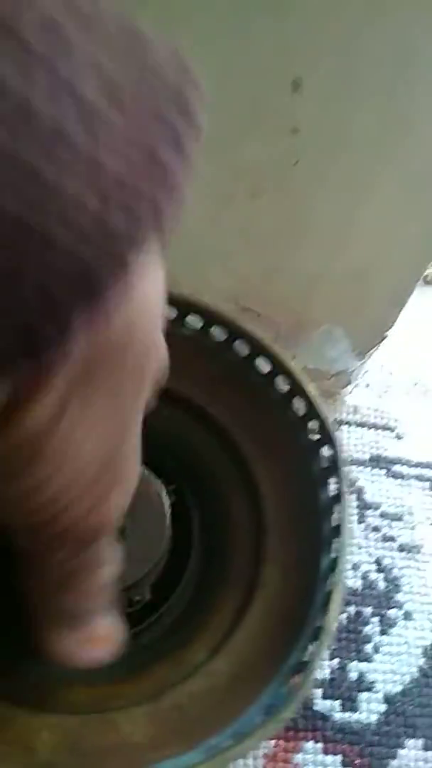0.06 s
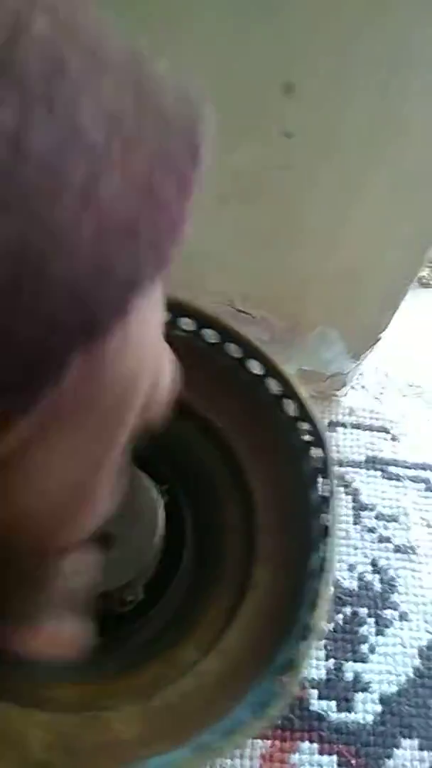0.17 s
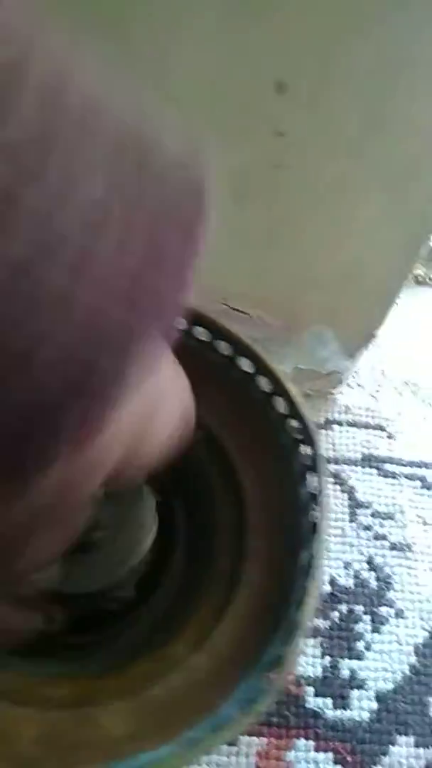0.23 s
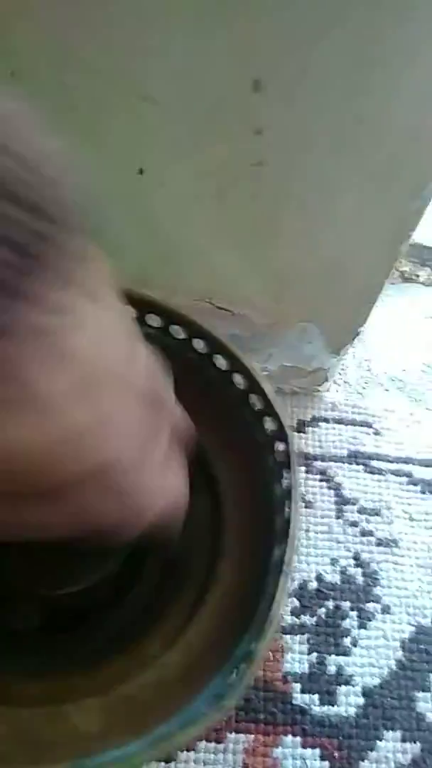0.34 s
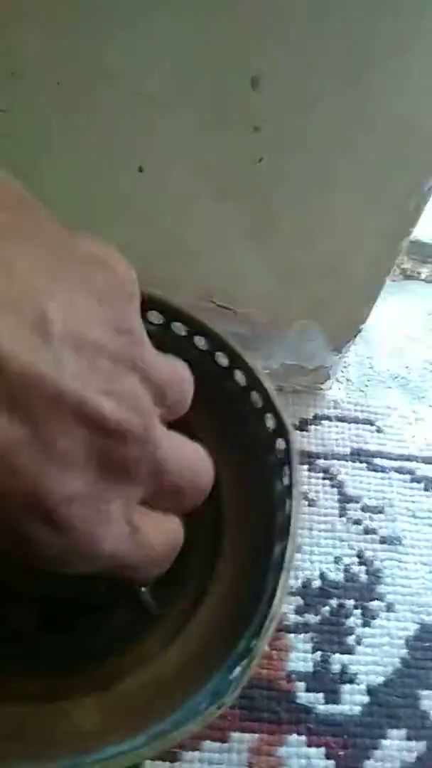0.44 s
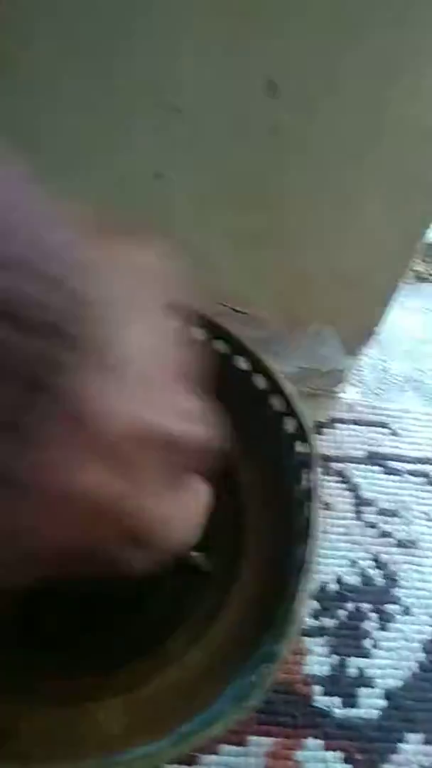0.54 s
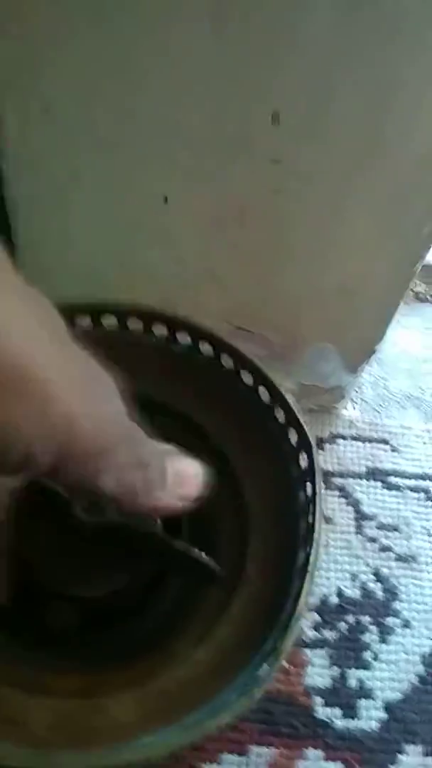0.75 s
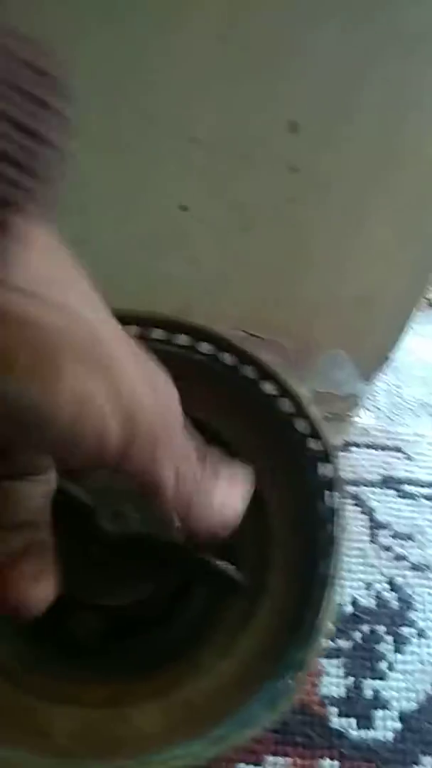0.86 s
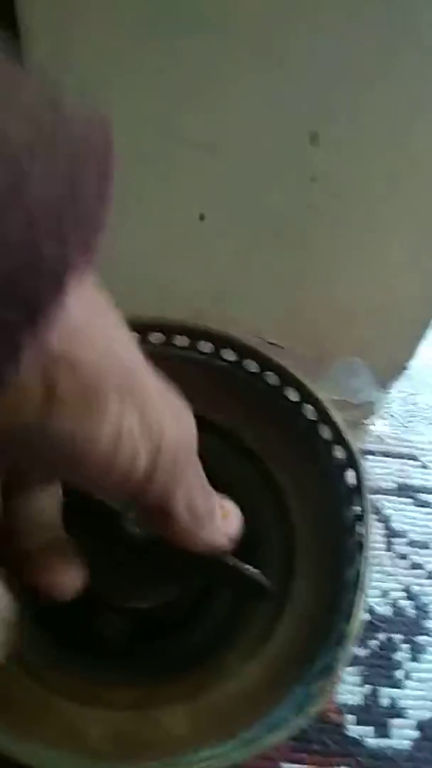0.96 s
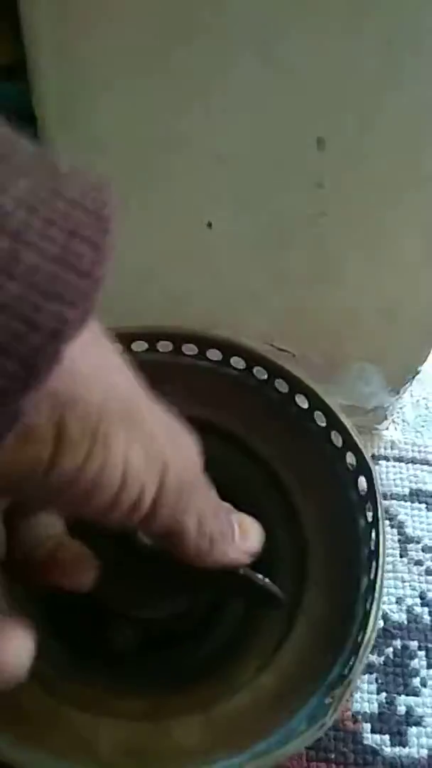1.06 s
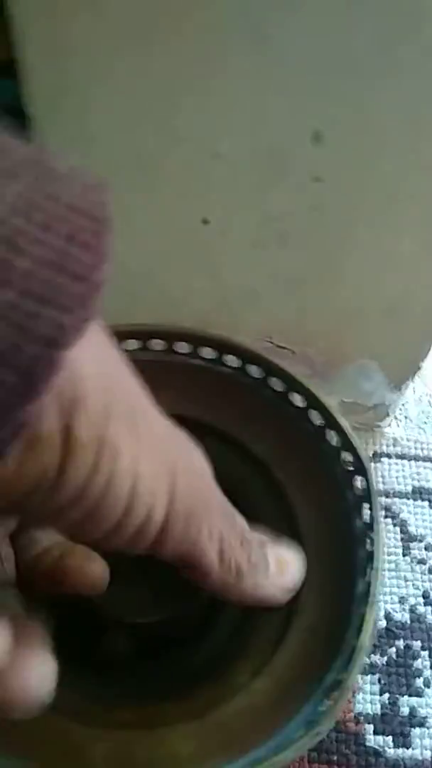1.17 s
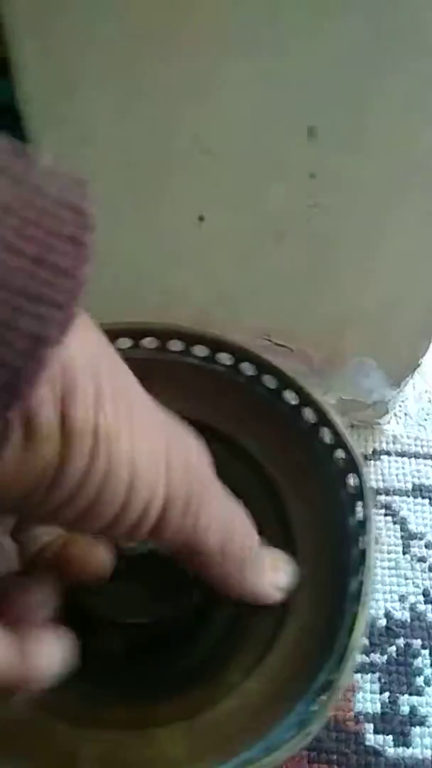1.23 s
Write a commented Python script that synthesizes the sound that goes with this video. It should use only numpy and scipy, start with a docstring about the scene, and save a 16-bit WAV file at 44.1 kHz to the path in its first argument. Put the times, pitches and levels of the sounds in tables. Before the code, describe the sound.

Close up, a hand winds a spring in a metal housing, making a short run of sharp clicks that grow darker and clackier. A low thud ends the run, and fingers softly rub, bump and squeak on the metal.

```python
"""Up close to a round metal housing, a hand gives the spring mechanism inside one quick turn.
At each ratchet tooth the pawl knocks dully, then snaps down and sets the steel ringing;
as the spring tightens, the snaps darken and their clack and ring grow.
The spring settles back with a low double thud that rings the housing.
Underneath, the hand rubs, bumps and squeaks on the metal."""
import sys
import numpy as np
from scipy import signal
from scipy.fft import rfft, irfft
from scipy.io import wavfile
from scipy.ndimage import uniform_filter1d

SR = 44100
rng = np.random.default_rng(int(sys.argv[2]) if len(sys.argv) > 2 else 0)


def materialize(psi):
    """Save the field psi as 16-bit PCM at rate SR to the path in sys.argv[1].

    A 1-D psi becomes a single channel; in a 2-D psi each row is a channel.
    """
    bounded = np.clip(np.atleast_2d(psi).T, -1, 1)
    quanta = np.round(bounded * 32767).astype(np.int16)
    wavfile.write(sys.argv[1], SR, quanta)


N = 57330

# Fader moves for the three bands of hand rub: time_s, bass_db, middle_db, treble_db
RUB_LEVELS = [(0, -66, -59.5, -75), (.18, -64.5, -57, -65), (0.558, -47, -46, -48.5),
              (0.675, -46, -48.5, -63), (0.848, -55.5, -71, -67.5), (0.913, -52, -65.5, -67),
              (1.101, -53, -56, -68), (1.178, -60, -55.5, -61.5), (1.3, -67, -75.5, -71.5)]
# EQ of each rub band: freq_hz, gain_db
RUB_BASS_EQ = [(20, -14), (130, 9.5), (180, 7), (280, -20), (600, -56)]
RUB_MIDDLE_EQ = [(100, -15.5), (260, 8.5), (520, 0.5), (800, -4.5), (1100, -22.5), (2000, -14.5),
                 (4000, -36.5)]
RUB_TREBLE_EQ = [(1000, -29.5), (2700, 5.5), (3600, -6.5), (6200, -4.5), (9000, 4), (15500, -15.5)]
# Soft bumps of the hand on the housing: start_s, level_db
HAND_BUMPS = [(0.531, -48), (0.64, -57), (0.95, -41.5), (1.018, -38.5), (1.278, -45.5)]
# Squeaks of skin on metal: start_s, length_s, level_db, pitch_hz
SKIN_SQUEAKS = [(0.113, 0.055, -48.5, 628), (0.888, 0.09, -58.5, 540), (1.156, 0.068, -57, 460)]
# Catches of a sliding finger, each rubbing a resonance: start_s, level_db, centre_hz, width_hz
FINGER_SLIDES = [(1.125, -65, 6700, 1400), (1.161, -59, 5300, 900), (1.19, -59.5, 3300, 1000)]

# Blows of the settling spring: start_s, level_db, attack_s, tilt_db_per_octave, pan_left_db
SPRING_BLOWS = [(.5680, -13, 0.00279, -24.5, 12), (.5763, -28.5, 0.0004, 1, 10.5)]
# Modes of the housing, lowest first: pitch_hz, level_db, t60_s
HOUSING_MODES = [(125.4, -23, 0.4), (484, -6, 0.035), (606.5, -2, 0.05), (861, -19, 0.091),
                 (1065, -6, 0.05), (1497, -13.5, 0.18), (1824, -5.5, 0.08), (2532, -16, 0.14)]
# EQ of the scuff on each blow: freq_hz, gain_db
SCUFF_EQ = [(1100, 19.5), (4000, -4.5), (16000, -36)]

# One cue per ratchet tooth: snap_start_s, snap_db, snap_fade_s, knock_db
RATCHET_TEETH = [(0.1582, -39, 0.0047, -70), (0.204, -19.5, 0.0045, -26.5), (0.2331, -18.5, 0.0079, -25.5),
                 (0.2617, -15.5, 0.0049, -26), (.2830, -16.5, 0.0037, -27.5),
                 (0.3069, -16.5, 0.0045, -27.5), (0.3248, -17, 0.0089, -26), (0.3482, -17.5, 0.0044, -25),
                 (0.3656, -15, 0.009, -23.5), (0.3855, -16.5, 0.01, -27.5), (0.4, -16.5, 0.024, -23),
                 (0.421, -19.5, 0.012, -24.5), (0.4429, -13.5, 0.0068, -23), (0.4646, -19, 0.0046, -34.5),
                 (0.4959, -16, 0.0059, -24)]
# Bounces of the pawl: start_s, level_db
PAWL_BOUNCES = [(0.3125, -19.5), (0.411, -14.5), (0.4545, -25.5)]
# EQ of the bright snap and of the clack beneath it: freq_hz, gain_db
SNAP_EQ = [(3500, -17.5), (4600, -11.5), (5700, -8), (6500, -5), (7200, -7.5), (8150, -11), (8700, -3),
           (9700, -1.5), (11200, -3.5), (12150, -14), (12800, -12), (14000, -6), (15400, -8), (16500, -44)]
CLACK_EQ = [(100, -11.5), (600, -9.5), (1400, 0), (2800, -3.5), (3500, -9.5), (6000, -27)]
# Stereo image of snap and clack: freq_hz, pan_left_db
SNAP_IMAGE = [(1400, 2), (3000, 1.5), (7000, 2), (11500, -2), (15000, 5.5)]
# Modes of the ringing steel: pitch_hz, level_db, t60_s
STEEL_MODES = [(1484, -7, .16), (2945, -4, .12), (4775, -9, .22), (5630, -4, .14), (5728, -3, .18),
               (7294, -5, .14), (7860, -9, .2), (8796, 0, .16), (9394, 3, .1), (9720, 3, .09),
               (9921, 1, .11), (10207, -3, .13), (11057, 1, .08), (12950, -7, .13)]


def amp(db):
    """Decibels to linear gain."""
    return 10 ** (np.asarray(db) / 20)


def unit_rms(x):
    """A signal scaled to an rms of 1."""
    return x / np.sqrt(np.mean(x ** 2) + 1e-20)


def curve_at(points, hz):
    """An EQ or pan curve, joined by straight lines over log frequency."""
    freqs, values = np.transpose(points)
    return np.interp(np.log(hz + 1), np.log(freqs + 1), values)


def pan(left_db):
    """Constant-power stereo gains, the left channel left_db above the right."""
    half_db = np.atleast_1d(left_db) / 2
    gains = amp([half_db, -half_db])
    return gains / np.sqrt(np.mean(gains ** 2, 0))


def add(mix, start_s, sound):
    """Drop a sound into the mix at its cue."""
    part = mix[:, round(start_s * SR):][:, :sound.shape[-1]]
    part += sound[..., :part.shape[1]]


def noise(eq, size, image=None, correlation=0.18):
    """Wide, coloured stereo noise of rms 1."""
    left, other = rng.standard_normal((2, size))
    right = correlation * left + np.sqrt(1 - correlation ** 2) * other
    hz = np.fft.rfftfreq(size, 1 / SR)
    spectrum = rfft([left, right]) * amp(curve_at(eq, hz))
    if image:
        spectrum *= pan(curve_at(image, hz))
    return unit_rms(irfft(spectrum, size))


def wander(samples):
    """Random modulation of rms 1, smoothed over the given span."""
    return unit_rms(uniform_filter1d(uniform_filter1d(rng.standard_normal(N), samples), samples))


def burst(t, attack_s, hold_s, fade_s):
    """Linear attack, hold and exponential release."""
    return np.minimum(t / attack_s, 1) * np.exp(-np.maximum(t - attack_s - hold_s, 0) / fade_s)


def decay(t, t60_s):
    """The tail of a freely ringing mode."""
    return np.exp(-np.log(1000) * t / t60_s)


def grain(depth_db=1.5):
    """A fast level flicker that roughens the rubbing."""
    return unit_rms(amp(depth_db * wander(samples=160)))


def hand():
    """Skin on the housing: a bed of grainy rub with soft bumps, squeaks and a sliding finger."""
    out, t = np.zeros((2, N)), np.arange(N) / SR
    times_s, *faders_db = np.transpose(RUB_LEVELS)
    for eq, fader_db in zip((RUB_BASS_EQ, RUB_MIDDLE_EQ, RUB_TREBLE_EQ), faders_db):
        out += noise(eq, N) * amp(np.interp(t, times_s, fader_db)) * grain()
    bump_hz, squeak_wobble = 154.7, 0.026
    bump = burst(t, attack_s=0.0057, hold_s=0, fade_s=0.036) * np.sin(2 * np.pi * bump_hz * t)
    for start_s, level_db in HAND_BUMPS:
        add(out, start_s, amp(level_db) * bump)
    for start_s, length_s, level_db, pitch_hz in SKIN_SQUEAKS:
        size = int(length_s * SR)
        cycles = np.cumsum(pitch_hz * (1 + squeak_wobble * wander(samples=150)[:size])) / SR
        add(out, start_s, amp(level_db) * np.hanning(size) ** 0.5 * np.sin(2 * np.pi * cycles))
    stroke = burst(t, attack_s=0.006, hold_s=0.035, fade_s=0.025)
    for start_s, level_db, centre_hz, width_hz in FINGER_SLIDES:
        resonance = [(centre_hz + step * width_hz, -20 * abs(step)) for step in range(-2, 3)]
        add(out, start_s, amp(level_db) * stroke * noise(resonance, N) * grain())
    return out * pan(left_db=3.5)


def spring_thud():
    """The spring settles: a deep, soft blow and a lighter, harder one ring the housing."""
    out, t = np.zeros((2, N)), np.arange(SR // 3) / SR
    scuff_db, scuff_fade_s, low_cut_hz = 2, 0.011, 89  # the blows carry little below the cut
    strongest_hz = max(HOUSING_MODES, key=lambda mode: mode[1])[0]
    for start_s, level_db, attack_s, tilt, left_db in SPRING_BLOWS:
        body = 0
        for hz, mode_db, t60_s in HOUSING_MODES:
            octaves_above = max(np.log2(hz / strongest_hz), 0)
            tone = np.cos(2 * np.pi * hz * (t - attack_s))
            body += amp(mode_db + tilt * octaves_above) * decay(t, t60_s) * tone
        scuff = amp(scuff_db + tilt) * noise(SCUFF_EQ, len(t)) * np.exp(-t / scuff_fade_s)
        onset = np.minimum(t / attack_s, 1) ** 2
        add(out, start_s, amp(level_db) * pan(left_db) * onset * (body + scuff))
    return signal.sosfilt(signal.butter(2, low_cut_hz, "highpass", fs=SR, output="sos"), out)


def pawl_knocks(lead_s):
    """Ahead of each snap, a dead knock with a low push stirs the housing's lowest mode."""
    out, t = np.zeros((2, N)), np.arange(SR // 4) / SR
    knock_hz, knock_s, push_hz, push_s = 480, 0.0006, 94, 0.0026
    knock_shape = (t / knock_s / 2) ** 2 * np.exp(2 - t / knock_s)
    push_shape = amp(db=-11.5) * t / push_s * np.exp(1 - t / push_s)
    boom = amp(db=-13.5) * decay(t, t60_s=0.13) * np.sin(2 * np.pi * HOUSING_MODES[0][0] * t)
    for snap_start_s, _, _, knock_db in RATCHET_TEETH:
        scattered_hz = knock_hz * np.exp(0.4 * rng.standard_normal((2, 1)))
        knock = knock_shape * np.sin(2 * np.pi * scattered_hz * (t - knock_s))
        push_phase = rng.random() + 0.5 * rng.random((2, 1))
        push = push_shape * np.sin(2 * np.pi * (push_hz * t + push_phase))
        hit = pan(left_db=8) * (knock + rng.choice([-1, 1]) * boom) + push
        add(out, snap_start_s - lead_s, amp(knock_db) * hit)
    return out


def steel_resonance(dry):
    """Crowded steel resonances: peaks at the modes and fine random notches in the treble."""
    ripple_depth_db, ripple_spacing_hz, ripple_full_hz = 9, 85, 8000
    peak_db, half_width_hz = 7, 45
    hz = np.fft.rfftfreq(4096, 1 / SR)
    ripple = np.interp(hz / ripple_spacing_hz, np.arange(1000), rng.standard_normal(1000))
    ripple_db = ripple_depth_db * np.clip(ripple, -2, 0.5) * np.minimum(hz / ripple_full_hz, 1) ** 2
    peaks = np.max([1 / (1 + ((hz - mode[0]) / half_width_hz) ** 2) for mode in STEEL_MODES], axis=0)
    log_gain = np.log(unit_rms(amp(ripple_db + peak_db * peaks)))
    # Minimum phase keeps all the ringing behind the transient.
    mirrored = np.r_[log_gain, log_gain[-2:0:-1]]
    impulse = np.fft.ifft(np.exp(np.conj(signal.hilbert(mirrored)))).real
    return signal.fftconvolve(dry, impulse[None, :len(hz)], axes=1)[:, :N]


def steel_ring(t, modes, spread_db=2.5):
    """The thin ring of struck steel, its modes balanced afresh on every hit."""
    return sum(amp(level_db + spread_db * rng.standard_normal()) * decay(t, t60_s)
               * np.sin(2 * np.pi * (hz * t + rng.random((2, 1)))) for hz, level_db, t60_s in modes)


def pawl_snap(size, wound_s, spread_db=3):
    """Bright chatter over a lower clack: the tighter the spring, the darker and clackier."""
    tilt_db_per_octave, clack_db = 3 - 7.4 * wound_s, -13 + 10 * wound_s
    hz = np.arange(1000, 18000, 200)
    eq_db = curve_at(SNAP_EQ, hz) + tilt_db_per_octave * np.log2(hz / 10000)
    eq_db += spread_db * rng.standard_normal(len(hz))
    chatter = noise(list(zip(hz, eq_db)), size, SNAP_IMAGE)
    return chatter + amp(clack_db) * noise(CLACK_EQ, size, SNAP_IMAGE)


def ratchet(knock_lead_s):
    """The pawl snaps down tooth by tooth, bouncing now and then and ringing the steel and coil."""
    chatter, ring, t = np.zeros((2, N)), np.zeros((2, N)), np.arange(SR // 4) / SR
    ring_db, ring_growth_db_per_s = -21.5, 17.5  # the ring grows with the tension
    damp_db, damp_s = -7.5, 0.0081  # the pawl damps the tail as it rides the next tooth
    coil_hz, coil_t60_s = rng.uniform(4500, 15000, size=36), 0.16  # faint high modes of the coil
    coil_db = curve_at(SNAP_EQ, coil_hz) - 1.5 - 10 * np.log10(len(coil_hz) / 2)
    modes = list(STEEL_MODES) + [(hz, db, coil_t60_s) for hz, db in zip(coil_hz, coil_db)]
    starts_s = [tooth[0] for tooth in RATCHET_TEETH]
    next_knocks_s = [start_s - knock_lead_s for start_s in starts_s[1:]] + [np.inf]
    for (start_s, snap_db, fade_s, _), next_knock_s in zip(RATCHET_TEETH, next_knocks_s):
        wound_s = start_s - starts_s[0]
        attack_s = 0.28 * fade_s  # a longer chatter also builds more slowly
        damping = np.clip((start_s + t - next_knock_s) / damp_s + 1, 0, 1)
        gain = amp(snap_db + damp_db * damping)
        snap = pawl_snap(len(t), wound_s) * burst(t, attack_s, hold_s=0.0016, fade_s=fade_s)
        steel = amp(ring_db + ring_growth_db_per_s * wound_s) * steel_ring(t, modes)
        add(chatter, start_s, gain * snap)
        add(ring, start_s, gain * steel * np.minimum(t / attack_s, 1))
    bounce_shape = burst(t, attack_s=0.0003, hold_s=0, fade_s=0.0011)
    for start_s, level_db in PAWL_BOUNCES:
        add(chatter, start_s, amp(level_db) * noise(SNAP_EQ, len(t), SNAP_IMAGE) * bounce_shape)
    # A taut spring resonates more, so the chatter crossfades into the steel's colour.
    tension = np.interp(np.arange(N) / SR, [starts_s[0], starts_s[-1]], [0, 1]) ** 0.5
    return (1 - tension) * chatter + steel_resonance(tension * chatter) + ring


def scene():
    """The mechanism and the hand, both close and dry."""
    knock_lead_s = 0.0062
    return ratchet(knock_lead_s) + pawl_knocks(knock_lead_s) + spring_thud() + hand()


def record(dry):
    """A steep low-pass trims the very top of the mix."""
    low_pass = signal.firwin(255, cutoff=15900, window=("kaiser", 8), fs=SR)
    return signal.oaconvolve(dry, low_pass[None], "same")


dry = scene()
out = record(dry)
materialize(out)
```